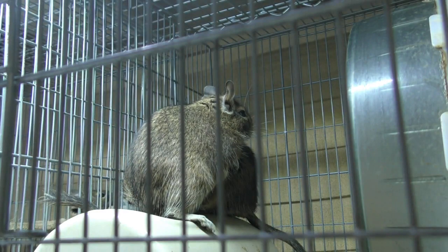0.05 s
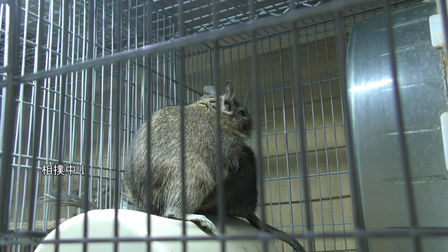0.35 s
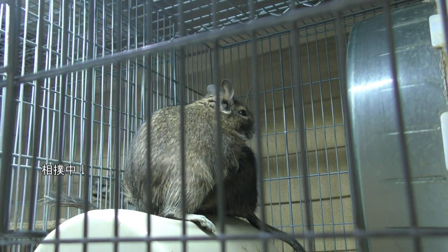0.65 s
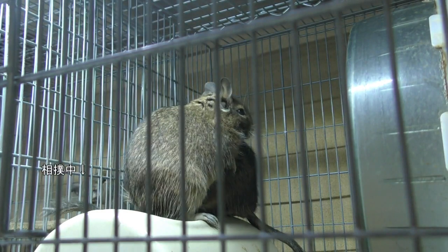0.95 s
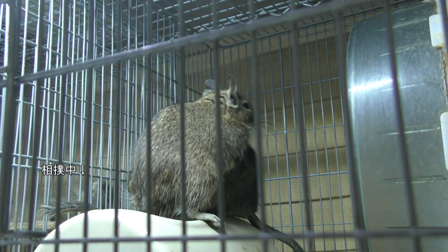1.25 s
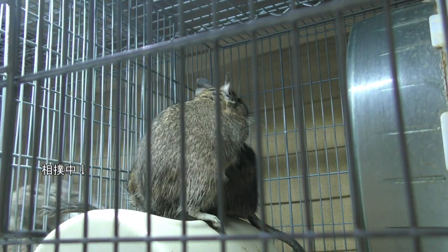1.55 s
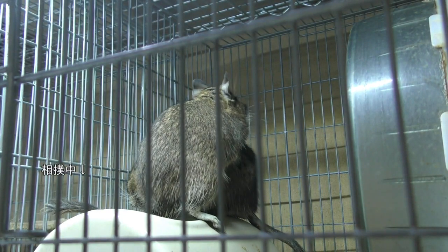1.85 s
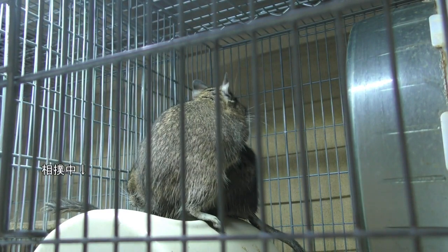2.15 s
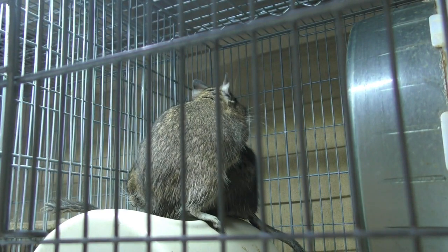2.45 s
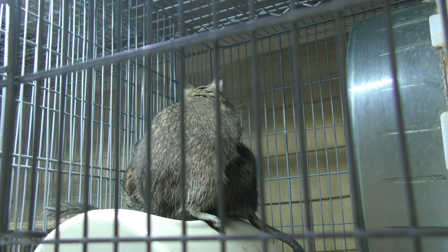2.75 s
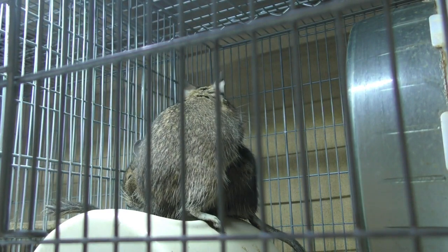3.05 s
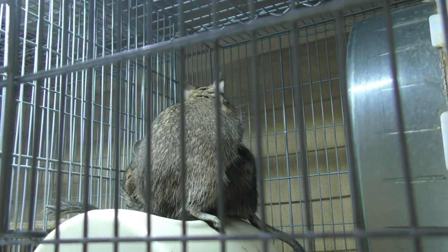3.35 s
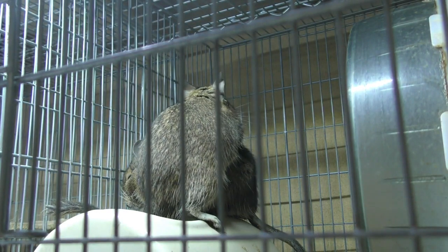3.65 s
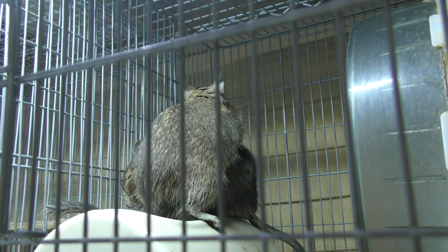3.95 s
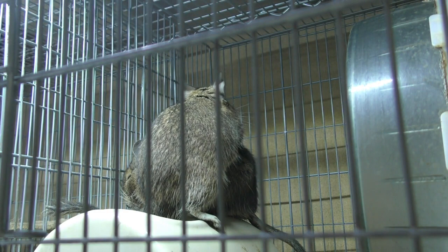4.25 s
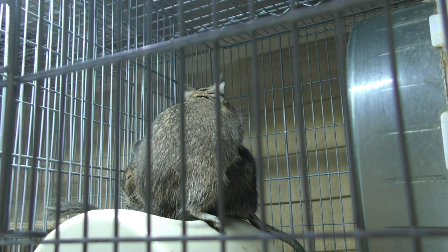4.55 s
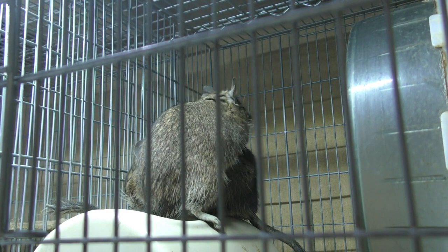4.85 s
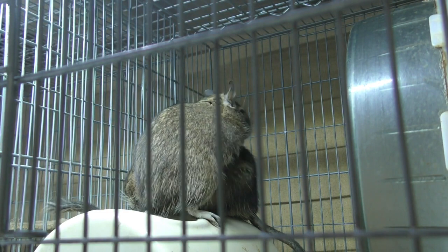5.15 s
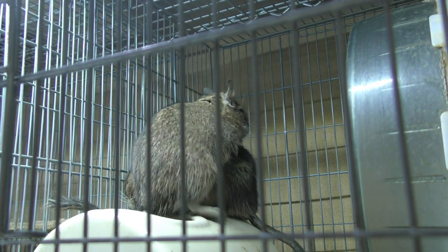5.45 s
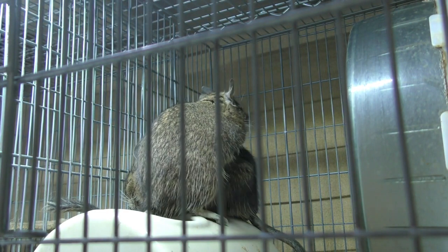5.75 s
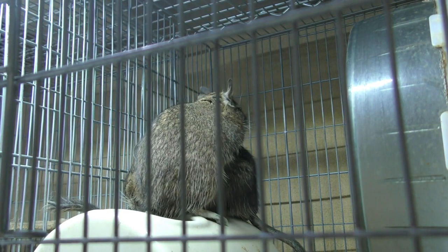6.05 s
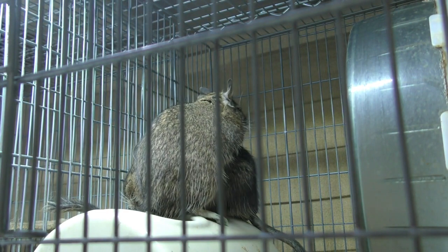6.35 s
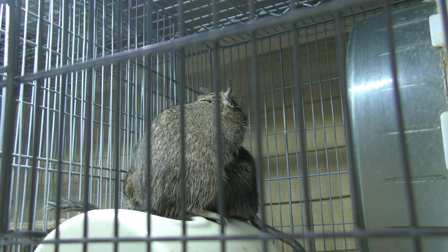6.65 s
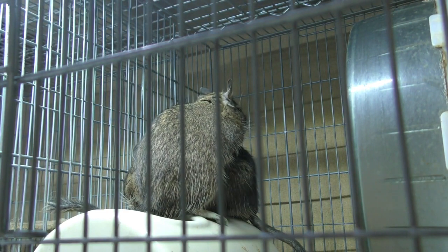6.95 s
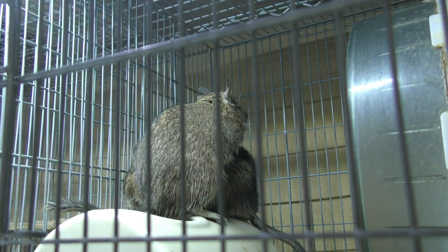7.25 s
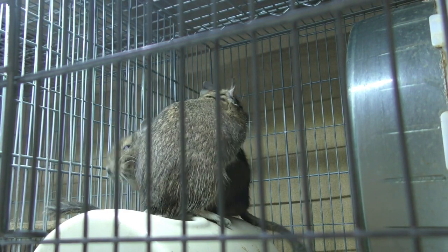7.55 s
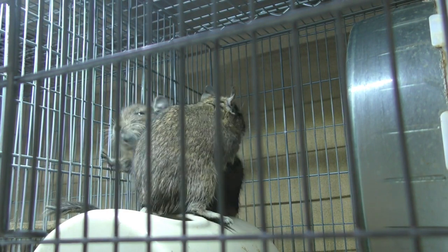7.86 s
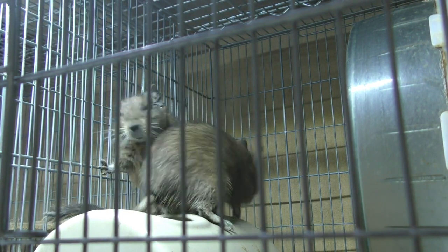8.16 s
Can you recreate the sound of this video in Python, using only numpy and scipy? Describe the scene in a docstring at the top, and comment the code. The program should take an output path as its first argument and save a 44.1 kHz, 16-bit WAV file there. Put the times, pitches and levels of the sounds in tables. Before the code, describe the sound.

Close by in an indoor wire cage, a small rodent's thin whine breaks into a loud falling squeal and a few hoarse chirps. Faint whimpers follow, then two runs of high chirps that start rough, settle into whistles and step down in pitch. Feet lightly tap and scrape the wire, and shifting bodies softly rumble a shelf over a low room hum.

```python
"""Degus squabble in a wire cage indoors, close to a stereo microphone. A thin whine breaks into a loud
falling squeal, then come soft whimpers and runs of chirps that start hoarse and settle into a whistle.
Their vocal folds sound through the throat, shaking and splitting under strain. Feet tap and scrape the
ringing cage and shifting bodies rumble the shelf, with the low hum of the room behind."""
import sys
import numpy as np
from scipy import signal
from scipy.fft import rfft, irfft
from scipy.io import wavfile

SR = 44100
rng = np.random.default_rng(int(sys.argv[2]) if len(sys.argv) > 2 else 0)


def generate_wav(sig):
    """Save sig (samples, or channels by samples) to the path in sys.argv[1] as 16-bit PCM at SR."""
    pcm = np.round(np.clip(np.atleast_2d(sig).T, -1, 1) * 32767).astype(np.int16)
    wavfile.write(sys.argv[1], SR, pcm)


N = 366030


def from_db(db):
    """Decibels to gain."""
    return 10 ** (np.asarray(db) / 20)


def rms_one(x):
    """Scale to rms 1."""
    return x / np.sqrt(np.mean(x ** 2) + 1e-20)


def at_hz(points, hz):
    """Read a spectrum's level in dB on a log-frequency axis."""
    known_hz, db = np.transpose(points)
    return np.interp(np.log(hz + 1), np.log(known_hz), db)


def wander(rate_hz, size, count=2048):
    """Smooth random motion with spread about 1; it holds still after count random points."""
    knots = np.arange(size) * rate_hz / SR
    return np.interp(knots, np.arange(count), rng.standard_normal(count))


def band(x, low_hz, high_hz):
    """Gentle band-pass."""
    return signal.sosfilt(signal.butter(2, [low_hz, high_hz], "band", fs=SR, output="sos"), x)


def noise(spectrum, side_db):
    """Coloured stereo noise; its bass reaches both sides of the microphone nearly alike."""
    hz = np.fft.rfftfreq(N, 1 / SR)
    mid, side = rfft(rng.standard_normal((2, N))) * from_db(at_hz(spectrum, hz))
    side = side * from_db(side_db + at_hz([(130, -7), (500, -3.0)], hz))
    return rms_one(irfft(np.array([mid + side, mid - side]), N))


def ring(clicks, hz, t60):
    """A unit click sets a sine of height 1 ringing."""
    r, w = from_db(-60 / (t60 * SR)), 2 * np.pi * hz / SR
    return signal.lfilter([0, np.sin(w)], [1, -2 * r * np.cos(w), r * r], clicks + 1e-18)


# room tone around the cage: (frequency [Hz], relative level [dB])
ROOM_SPECTRUM = [(30, -40), (65, 5), (140, -2), (450, -8.5), (700, -26), (1300, -11), (3000, -20),
                 (6000, -34.5), (15000, -26.5)]

def room_tone(hum_hz=136, hum_db=-59, noise_db=-54):
    """Behind the cage, a low hum wavers over steady noise."""
    t = np.arange(N) / SR
    hum = from_db(hum_db + 2 * wander(8, N)) * np.sin(2 * np.pi * hum_hz * t)
    return hum + from_db(noise_db) * noise(ROOM_SPECTRUM, side_db=-3.5)


# rumble of the shelf in the cage: (frequency [Hz], relative level [dB])
SHELF_SPECTRUM = [(70, -2.5), (220, 6.5), (450, -12.5), (680, -19.5), (1250, -9.5), (2500, -34),
                  (5000, -46.5)]
# bodies shifting on it: (peak time [s], half-width [s], level [dB])
BODY_SHIFTS = [(.15, 0.02, -48.5), (1.849, 0.14, -40), (2.08, 0.26, -55), (3.03, 0.17, -54.5),
               (4.25, 0.13, -51.5), (4.631, 0.077, -47.5), (5.8, 0.09, -47), (6.28, 0.15, -50),
               (7.12, 0.071, -54)]

def shuffle(fidget_db=-59.5):
    """The shelf rumbles as the bodies fidget, and swells as they shift their weight."""
    t = np.arange(N) / SR
    shifts = sum(from_db(db) * np.exp(-((t - s) / width) ** 2) for s, width, db in BODY_SHIFTS)
    weight = (from_db(fidget_db) + shifts) * from_db(4.3 * wander(22, N))
    return weight * noise(SHELF_SPECTRUM, side_db=-8.0)


# feet tapping the cage, close by: (time [s], relative level [dB])
FOOT_TAPS = [(0.1092, -50), (0.2088, -45), (0.442, -53), (0.484, -43.5), (0.965, -48.5), (1.544, -41.5),
             (1.6705, -36.5), (2.9882, -46.5), (3.215, -47.5), (4.5945, -43), (5.771, -53), (6.071, -55.5),
             (6.2623, -42), (6.505, -45.5), (7.023, -51.5), (7.179, -51.5), (7.447, -49.5), (7.684, -46.5)]
# claws scraping it: (time [s], length [s], relative ring level [dB], relative hiss level [dB])
CLAW_SCRAPES = [(0.105, 0.034, -44, -55), (0.322, 1, -62.5, -64), (0.836, 0.042, -66, -57.5),
                (1.52, 0.67, -45.5, -55), (3.466, 0.046, -58.5, -61.5), (3.64, 0.091, -54.5, -62),
                (3.995, 0.046, -56, -54), (4.151, .045, -52, -45.5), (4.19, 0.14, -50, -62.5),
                (4.615, 0.11, -51.5, -80.5), (6.232, 0.22, -49, -62.5), (6.502, 0.17, -52.5, -77),
                (8.222, 0.1, -48, -61)]
# resonances of the wire cage: (frequency [Hz], gain [dB], time to fall 60 dB [s])
WIRE_MODES = [(1206, 1.5, 0.064), (1427, 6.5, 0.032), (1692, 0, 0.044), (2360, 0, 0.042)]

def feet(steps_per_s=14, slide_s=.015):
    """Taps and the dense catches of scraping claws ring the cage; the scrapes also hiss."""
    t = np.arange(N) / SR
    taps, drag, hiss = np.zeros((3, N))
    for s, db in FOOT_TAPS:
        taps[round(s * SR)] = from_db(db - 3)
    grains = rms_one(rng.standard_normal(N) * from_db(2.98 * wander(180, N)))
    for s, length, ring_db, hiss_db in CLAW_SCRAPES:
        progress = np.clip((t - s) / length, 0, 1)
        stroke = np.sqrt(np.sin(np.pi * progress ** 0.29).clip(0))
        drag += from_db(ring_db) * stroke * grains
        hiss += from_db(hiss_db) * stroke * grains
    # small restless steps and scratches go on throughout
    taps += from_db(-55) * (2 * rng.random(N) - 1) * (rng.random(N) < steps_per_s / SR)
    hiss += from_db(-63) * grains * np.clip(wander(30, N), 0, 1) ** 2
    # a paw lands softly and slides for a moment
    slide = signal.lfilter([1], [1, -np.exp(-1 / (slide_s * SR))], abs(taps))
    drag += from_db(-19) * grains * slide
    force = taps + from_db(-27.5) * drag
    cage = sum(from_db(db) * ring(force, hz, t60) for hz, db, t60 in WIRE_MODES)
    rubbing = from_db(10.0) * band(drag, 1090, 3200)
    return band(cage + rubbing, 710, 2210) + band(hiss, 3700, 10900)


# response of a degu's throat and mouth: (frequency [Hz], relative gain [dB])
THROAT_RESPONSE = [(1700, -21), (3500, -14), (5000, -3), (6200, -2.5), (7800, -8.5), (10500, 3.5),
                   (16000, -11.5)]

def voice(path, jitter, rasp, split, flutter_db, fade_s=.005):
    """Vocal folds sound a harmonic stack through the throat; strain shakes them into half pitch."""
    # path: (time [s], pitch [Hz], level [dB], overtone slope [dB/octave], roughness [0-1])
    s, *columns = np.transpose(path)
    samples = np.arange(int(s[0] * SR), min(int(s[-1] * SR), N))
    t, size = samples / SR, len(samples)
    pitch, level_db, slope_db, rough = [np.interp(t, s, column) for column in columns]
    rough = np.clip(rough, 0, 1)
    pitch = pitch * (1 + 0.0089 * wander(109.5, size) + jitter * rough * wander(380, size))
    phase = 2 * np.pi * np.cumsum(pitch) / SR
    smear = rasp * rough   # hoarseness spreads each partial into a band
    tone, power = np.zeros((2, size))
    for harmonic in np.arange(.5, 14, .5):
        hz = harmonic * pitch
        tilt_db = slope_db * np.log2(max(harmonic, 1))
        gain = from_db(at_hz(THROAT_RESPONSE, hz) + tilt_db) * (hz < .4 * SR)
        if harmonic % 1:   # under high strain, unequal cycles put lines between the harmonics
            gain *= split * rough ** 2 * min(harmonic, 1)
        gain *= from_db(flutter_db * wander(117.7, size))   # flutter as the mouth moves
        angle = harmonic * phase + 2 * np.pi * rng.random()
        hoarse = wander(1700, size) * np.sin(angle) + wander(1700, size) * np.cos(angle)
        tone += gain * (np.sin(angle) + smear * hoarse)
        power += gain ** 2 * (.5 + smear ** 2 * 2 / 3)
    to_edge_s = np.minimum(t - t[0], t[-1] - t)
    fade = np.sin(np.pi / 2 * np.clip(to_edge_s / fade_s, 0, 1)) ** 2
    out = np.zeros(N)
    out[samples] = tone / np.sqrt(power) * fade * from_db(level_db + 2 * wander(203.7, size))
    return out


def soft_voice(path):
    """The voice of whines and whimpers, whose partials barely flutter."""
    return voice(path, jitter=0.057, rasp=0.99, split=1.0, flutter_db=0.5, fade_s=0.0065)


# the thin whine that leads up to the squeal: (time [s], pitch [Hz], level [dB])
WHINE_PATH = [(0.74, 3500, -54), (0.78, 2880, -60), (0.81, 3410, -58.5), (0.94, 3885, -52),
              (1.085, 4090, -53), (1.12, 3680, -57), (1.16, 3880, -47.5), (1.2, 3695, -42)]
# a high whistle sweeping up over it: (time [s], pitch [Hz], level [dB])
WHISTLE_PATH = [(1.03, 5300, -56), (1.06, 6600, -72), (1.087, 8700, -53), (1.162, 11000, -45)]

def whines(slope_db=-31):
    """Two nearly pure tones of the voice, faint even this close."""
    return sum(soft_voice([(s, hz, db, slope_db, rough) for s, hz, db in path])
               for path, rough in [(WHINE_PATH, 0.12), (WHISTLE_PATH, 0.046)])


# pips around the louder calls, and grunts after the squeal: (time [s], length [s], start pitch [Hz],
# end pitch [Hz], level [dB], overtone slope [dB/octave], roughness [0-1])
PIP_CALLS = [ (1.196, .02, 3400, 3188, -38.5, -7.5, .2), (1.813, 0.069, 2393, 2050, -44, -23, 0.42),
             (1.914, .195, 1421, 1062, -41, -8, 0.36), (1.998, 0.091, 3250, 4530, -41.5, -38, 0.48),
             (2.139, 0.062, 3046, 3560, -46, -18, 0.62), (4.982, 0.026, 10340, 9710, -34, -10, 0.1),
             (5.175, 0.045, 8730, 9800, -29, -10, 0.02), (5.385, 0.056, 5520, 5740, -41.5, -14.5, 0.14),
             (5.775, 0.055, 4700, 4320, -56, -22, 0), (5.84, 0.037, 5380, 4680, -36, -3.5, 0.38),
             (5.999, .052, 3940, 4020, -51.5, -20, .03), (7.591, 0.026, 5870, 4920, -38, -19, 0.65),
             (7.838, 0.042, 3820, 3600, -43.5, -6.5, 0.22), ]

def pip(s, length, start_hz, end_hz, db, slope_db, rough):
    """One push of the voice on a straight glide, peaking early and dying away."""
    swell = [(0, -1), (0.23, 0), (1, -5.5)]   # (share of the length [0-1], gain [dB])
    path = [(s + share * length, start_hz + share * (end_hz - start_hz), db + swell_db, slope_db, rough)
            for share, swell_db in swell]
    return voice(path, jitter=0.022, rasp=0.68, split=1.0, flutter_db=5.0)


# the long falling squeal, loud at the microphone: (time [s], pitch [Hz], level [dB])
SQUEAL_PATH = [(1.209, 3260, -31), (1.223, 3170, -23.5), (1.231, 2740, -17.5), (1.245, 2676, -22),
               (1.257, 2390, -24.5), (1.291, 2090, -23), (1.309, 1904, -26.5), (1.319, 1936, -24.5),
               (1.339, 1684, -28), (1.365, 1637, -26.5), (1.421, 1787, -27), (1.461, 1573, -29),
               (1.511, 1534, -26.5), (1.555, 1429, -29.5), (1.591, 1530, -30), (1.609, 1346, -31.5),
               (1.63, 1298, -37.5)]

def squeal(break_s=.075, end_s=.026):
    """Effort brightens the squeal; it is rough at both ends and clear between."""
    s, hz, db = np.transpose(SQUEAL_PATH)
    slope_db = .55 * (db + 23)   # overtones tilt upward when louder than -23 dB
    breaking = .33 * np.exp(-((s - s[0]) / break_s) ** 2)
    ending = .6 * np.exp((s - s[-1]) / end_s)
    path = np.transpose([s, hz, db, slope_db, .02 + breaking + ending])
    return voice(path, jitter=0.05, rasp=0.82, split=0.55, flutter_db=4.0)


# runs of chirps, close by: (time [s], climb [s], hold [s], top pitch [Hz], end pitch [Hz], level [dB],
# fade over the hold [dB], overtone slope [dB/octave], climb roughness [1 = full], hold roughness [0-1])
CHIRP_CALLS = [ (1.67, 0.029, 0.0055, 2300, 2346, -39.5, 4, 10, .45, .4),
               (1.718, 0.035, 0.057, 2680, 2707, -36.5, 3.5, -10, 0.6, 0.49),
               (1.878, 0.035, .006, 2620, 2700, -33.5, 6, -7, 0.36, 0.54),
               (4.778, 0.0067, 0.026, 6700, 7270, -40.5, 12, -21, 0.1, 0.07),
               (4.876, 0.035, 0.0059, 9790, 9630, -30, 3.5, -1, 0.57, 0.14),
               (5.079, 0.036, .018, 10100, 9600, -28, 3, -5, 0.32, 0.08),
               (5.285, .046, 0.014, 5750, 5540, -35, -2, -10.5, 1.17, 0.1),
               (5.488, 0.039, 0.045, 5940, 5330, -35.5, 6, -12.5, 1.15, 0.86),
               (5.66, 0.048, 0.066, 4760, 4890, -36, 2.5, -14.5, 1.23, 0.08),
               (5.94, 0.029, 0.04, 4260, 3950, -38.5, 13, -15.5, 1.1, 0.58),
               (7.141, .043, .047, 7980, 5960, -27.5, 5.5, -7.5, 0.62, 0.12),
               (7.31, 0.024, .008, 7970, 7650, -20.5, 11.5, -10.5, 0.13, 0),
               (7.444, 0.038, 0.065, 5530, 5194, -35, -2, -16.5, 1.1, 0.04),
               (7.68, 0.038, 0.061, 3796, 3450, -45, 13.5, -16, 0.93, 0.17),
               (7.933, .05, 0.021, 2460, 2130, -40.5, 8.5, -14, 0.6, .15),
               (8.052, 0.06, 0.033, 1864, 1670, -39.5, 13, -11, 0.36, 0.23),
               (8.197, .056, 0.039, 1783, 1672, -42.5, 12, -12.5, 0.73, 0.37), ]

def chirp(s, climb, hold, top_hz, end_hz, db, fade_db, slope_db, climb_rough, hold_rough):
    """The voice climbs hoarsely, holds a whistle, then drops in pitch and level as breath runs out."""
    octaves_per_s = 16 * (top_hz / 5500) ** 0.391   # higher chirps climb faster
    octaves = climb * octaves_per_s
    onset_db = db - 21 * octaves   # it grows louder as it climbs
    onset_slope_db = slope_db - 300 * climb   # a slow climb starts dull
    strain_share = 0.57   # it strains most this far up the climb
    strain_hz = top_hz / 2 ** (octaves * (1 - strain_share))
    end_s, end_db = s + climb + hold, db - fade_db
    onset = (s, top_hz / 2 ** octaves, onset_db, onset_slope_db, 0.84 * climb_rough)
    strain = (s + strain_share * climb, strain_hz, db - 2.5, slope_db + 4.5, climb_rough)
    top = (s + climb, top_hz, db, slope_db, hold_rough)
    end = (end_s, end_hz, end_db, slope_db, hold_rough)
    release = (end_s + .016, end_hz * 2 ** -0.064, end_db - 19.5, slope_db, hold_rough)
    return voice([onset, strain, top, end, release], jitter=0.044, rasp=1.0, split=1.0, flutter_db=6.0)


# clicks where the voice cracks: (time [s], level [dB])
VOICE_CRACKS = [(1.899, -32), (4.788, -47), (5.102, -38), (5.187, -42), (5.224, -50), (5.842, -32),
                (7.314, -40)]

def cracks(decay_s=0.0024):
    """Where the folds snap into a new motion, a bright click dies away at once."""
    t = np.arange(N) / SR
    snaps = sum(from_db(db) * np.exp(-abs(t - s) / decay_s) * (t >= s) for s, db in VOICE_CRACKS)
    return snaps * rms_one(band(rng.standard_normal(N), 6100, 13000))


# whimpers, faint at the microphone:
# (time [s], length [s], start pitch [Hz], end pitch [Hz], level [dB], roughness [0-1])
WHIMPER_CALLS = [ (2.235, 0.068, 3650, 3960, -58.5, 0.7), (2.535, 0.044, 3170, 3130, -58.5, 0.37),
                 (2.697, .1, 2558, 2800, -57, 0.16), (2.797, 0.11, 2390, 3350, -61.5, 0.23),
                 (2.901, 0.12, 3565, 3400, -59, 0.15), (3.129, 0.1, 2955, 2970, -59.5, 0.3),
                 (3.58, 0.09, 2780, 3280, -62, 0.38), (3.628, 0.067, 2380, 2510, -52, 0.84),
                 (3.848, 0.025, 2080, 1970, -61.5, 0.1), (3.917, .052, 2250, 2520, -61, 0.07),
                 (4.674, 0.097, 3760, 3790, -53.5, 0.42), (5.449, 0.048, 1336, 1410, -54.5, 0.14),
                 (7.01, 0.057, 2690, 2980, -55, 0.48), (7.778, 0.065, 3630, 3690, -58, 0), ]

def whimper(s, length, start_hz, end_hz, db, rough, slope_db=-22.5):
    """An even, soft glide of the voice with weak overtones."""
    return soft_voice([(s, start_hz, db, slope_db, rough), (s + length, end_hz, db, slope_db, rough)])


def reflections(x, t60, tail_db, near_db):
    """Shelf and wheel reflect quickly, then a short tail follows; each channel gets its own."""
    t = np.arange(SR // 2) / SR
    tail = rng.standard_normal((2, len(t))) * from_db(-60 * t / t60) * (t > .004)
    near = rng.standard_normal((2, len(t))) * np.exp(-t / 0.0056) * (t > .0004)
    response = (from_db(tail_db) * rms_one(tail) + from_db(near_db) * rms_one(near)) / np.sqrt(len(t))
    return x + signal.fftconvolve(x[None], response, axes=1)[:, :N]


def scene():
    """From beside the cage: voices and feet close by, the room behind."""
    calls = whines() + sum(pip(*row) for row in PIP_CALLS) + squeal()
    calls += sum(chirp(*row) for row in CHIRP_CALLS) + cracks()
    calls += sum(whimper(*row) for row in WHIMPER_CALLS)
    degus = reflections(calls, t60=0.08, tail_db=-9.5, near_db=-6.5)
    cage = reflections(feet(), t60=0.047, tail_db=-10.0, near_db=-4.5)
    return room_tone() + shuffle() + cage + degus


def record(dry):
    """The microphone sheds the bass below 45 Hz; the top is cut steeply at 16.1 kHz."""
    lean = signal.sosfilt(signal.butter(2, 45, "high", fs=SR, output="sos"), dry)
    return signal.sosfilt(signal.ellip(12, .1, 70, 16100, fs=SR, output="sos"), lean)


dry = scene()
out = record(dry)
generate_wav(out)
```